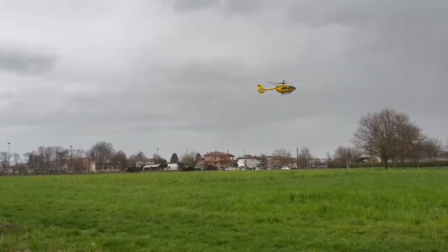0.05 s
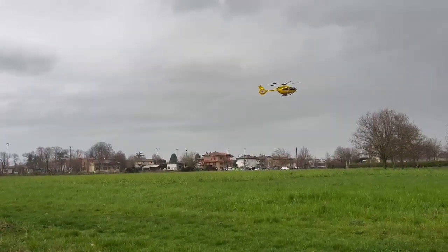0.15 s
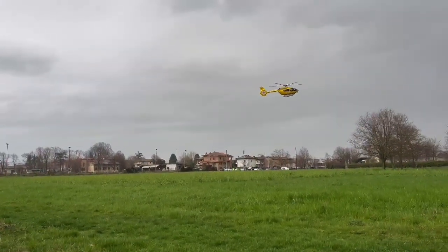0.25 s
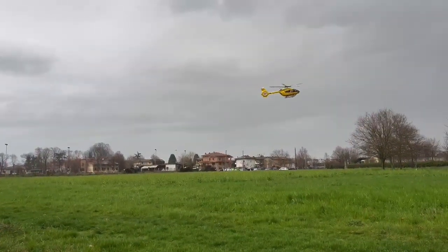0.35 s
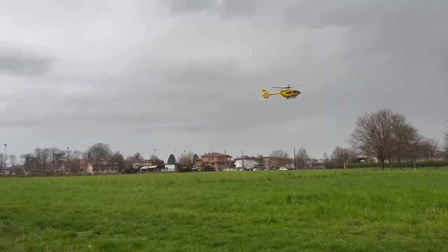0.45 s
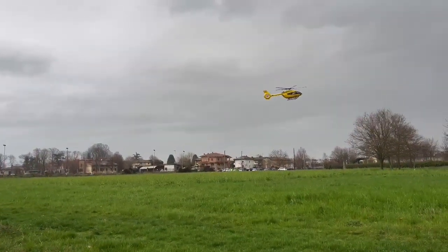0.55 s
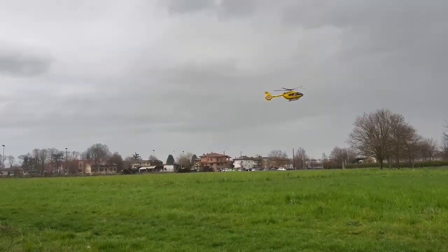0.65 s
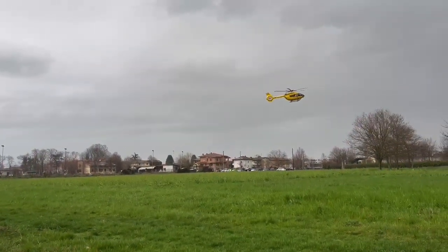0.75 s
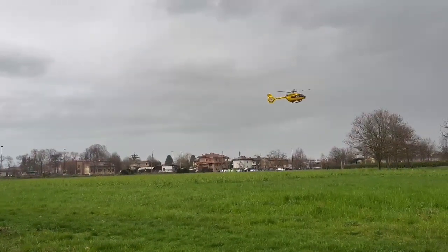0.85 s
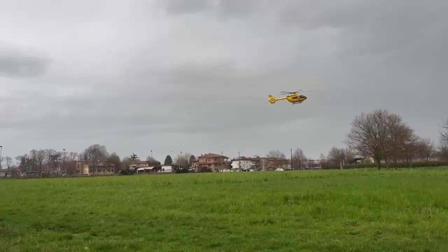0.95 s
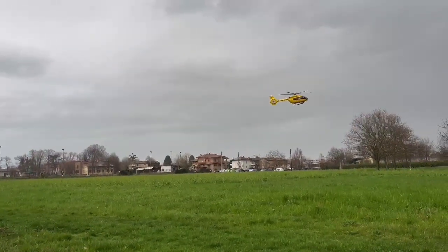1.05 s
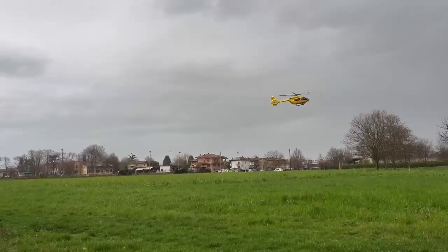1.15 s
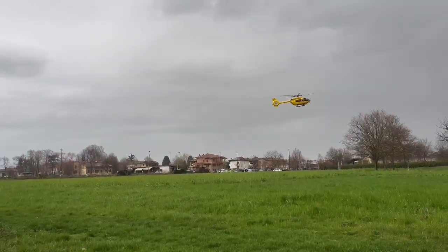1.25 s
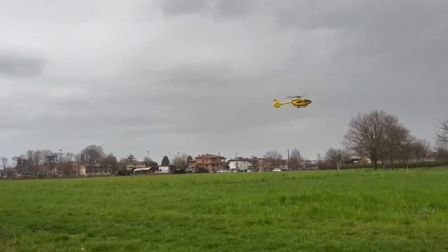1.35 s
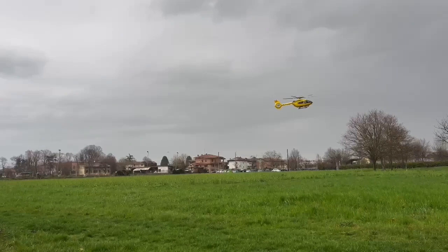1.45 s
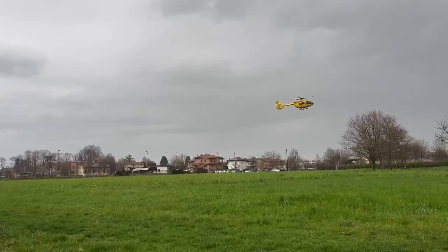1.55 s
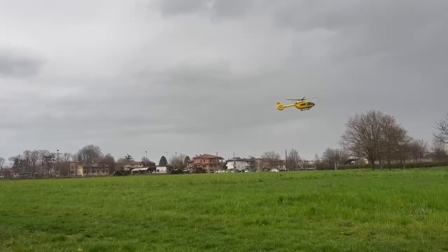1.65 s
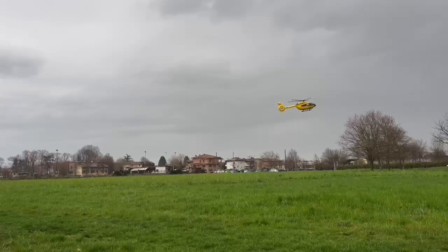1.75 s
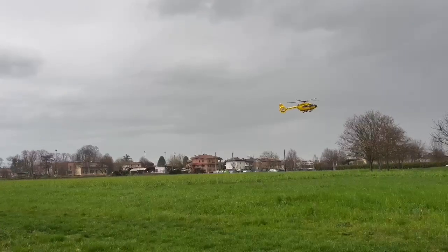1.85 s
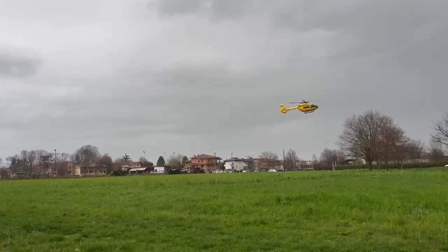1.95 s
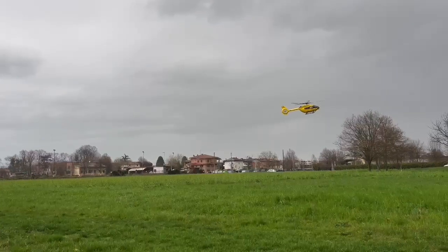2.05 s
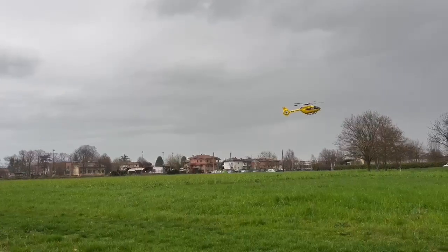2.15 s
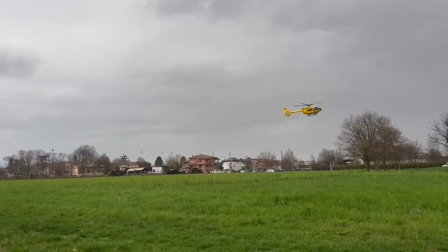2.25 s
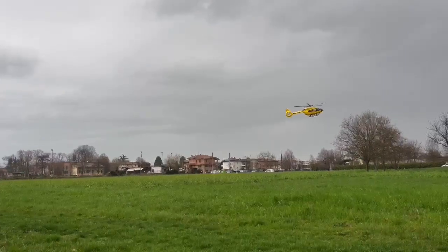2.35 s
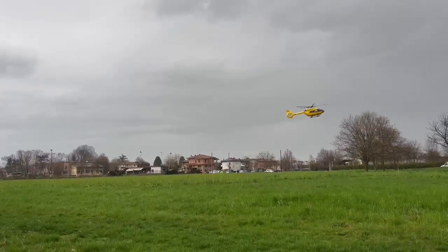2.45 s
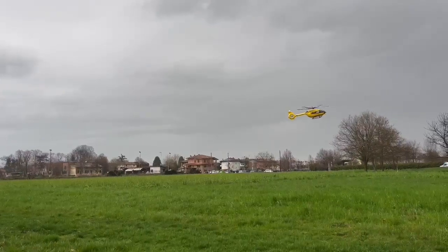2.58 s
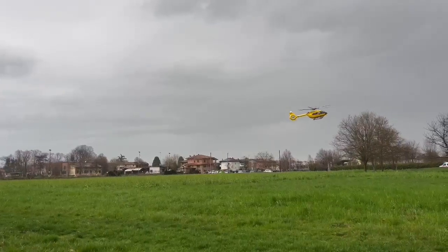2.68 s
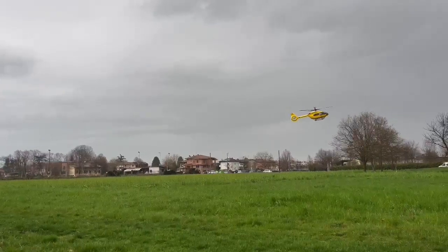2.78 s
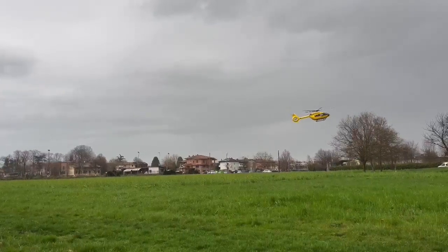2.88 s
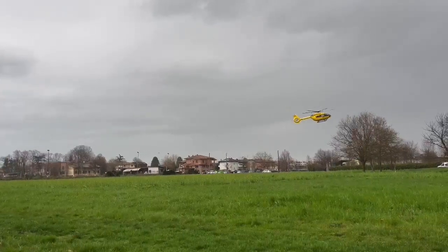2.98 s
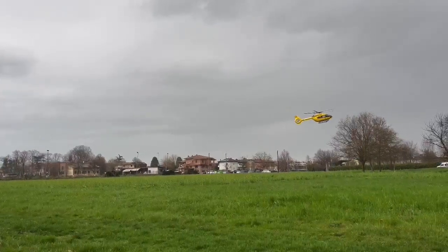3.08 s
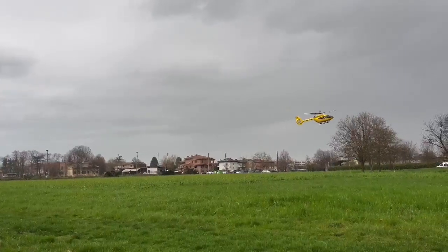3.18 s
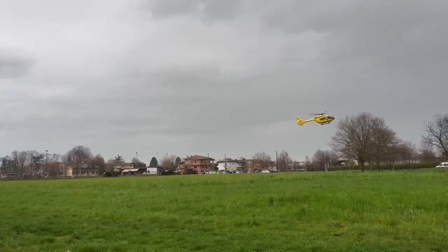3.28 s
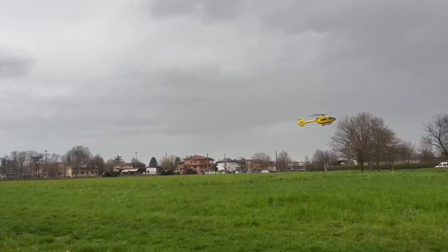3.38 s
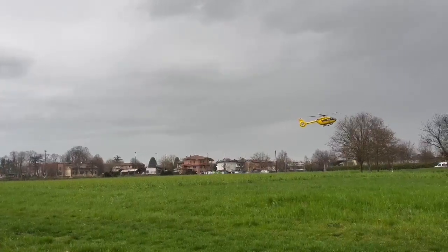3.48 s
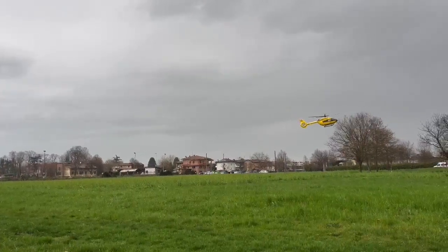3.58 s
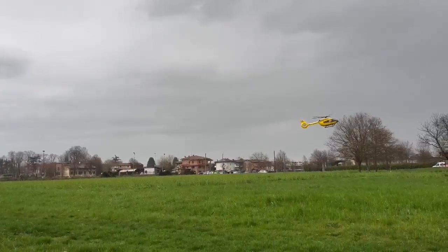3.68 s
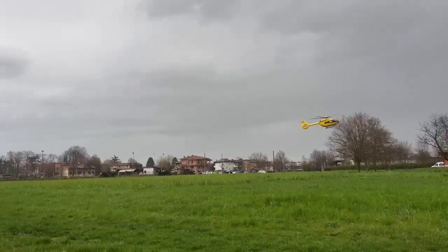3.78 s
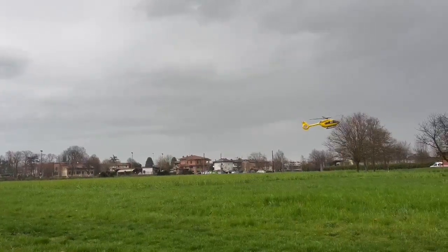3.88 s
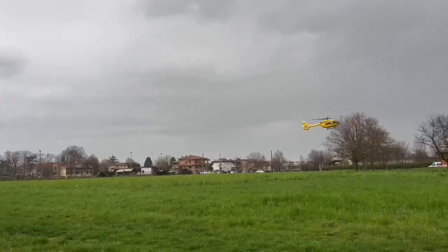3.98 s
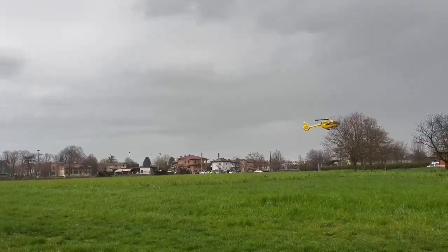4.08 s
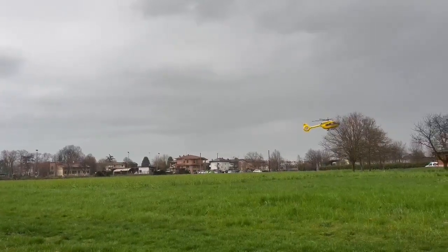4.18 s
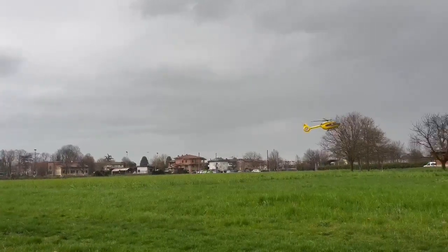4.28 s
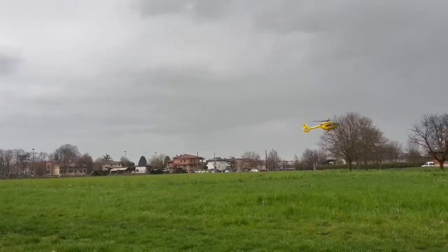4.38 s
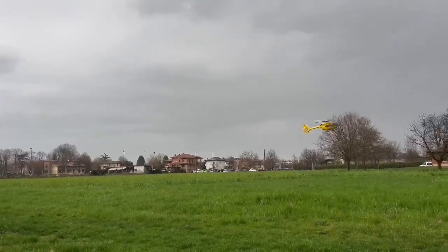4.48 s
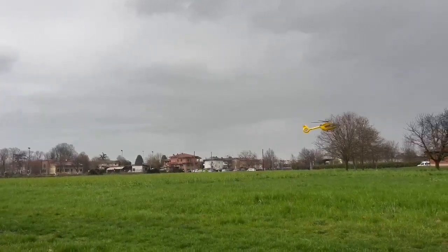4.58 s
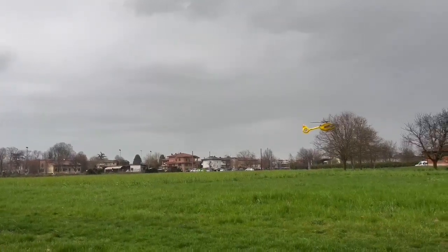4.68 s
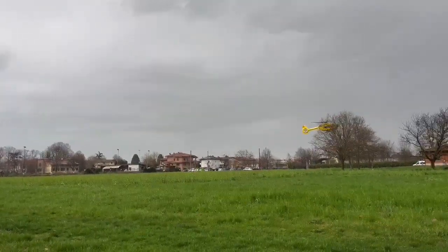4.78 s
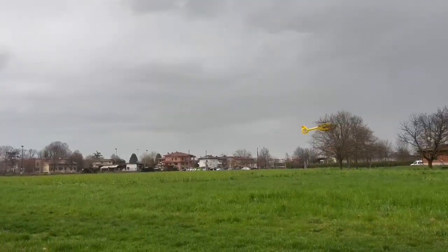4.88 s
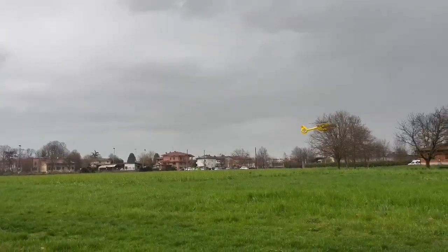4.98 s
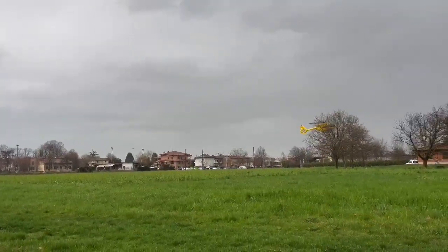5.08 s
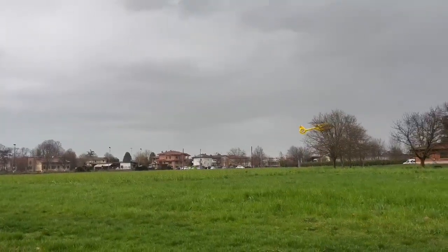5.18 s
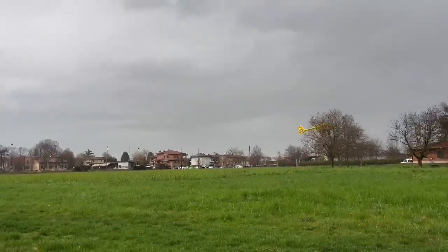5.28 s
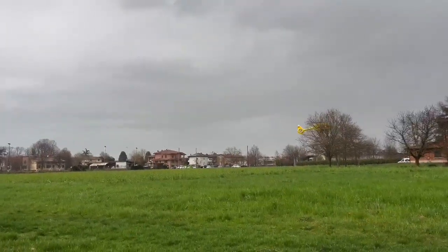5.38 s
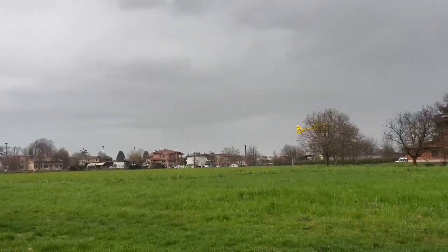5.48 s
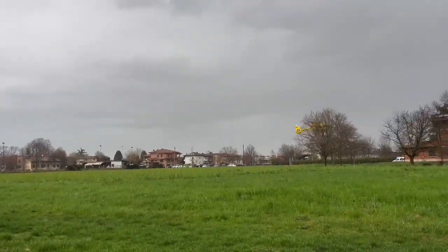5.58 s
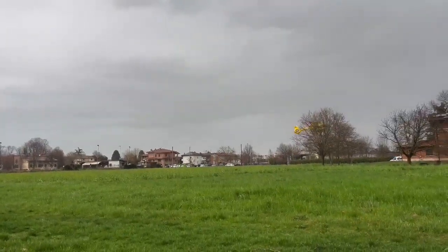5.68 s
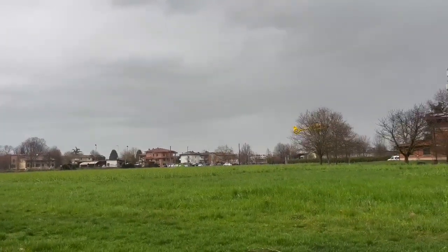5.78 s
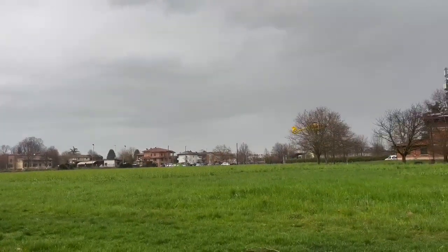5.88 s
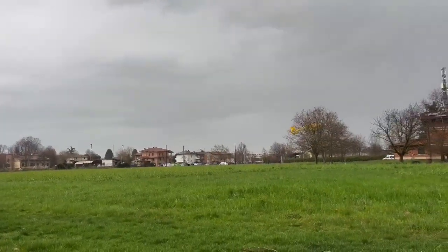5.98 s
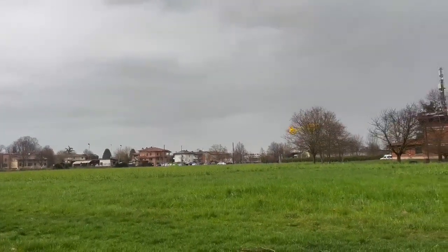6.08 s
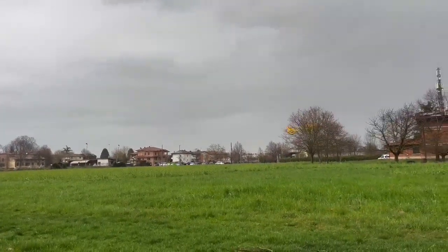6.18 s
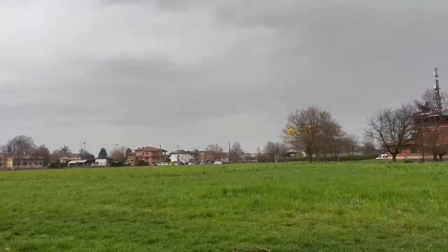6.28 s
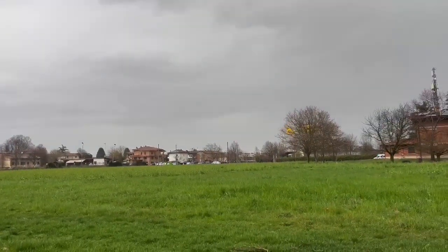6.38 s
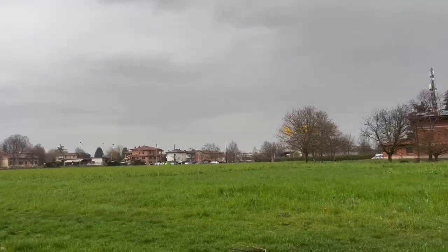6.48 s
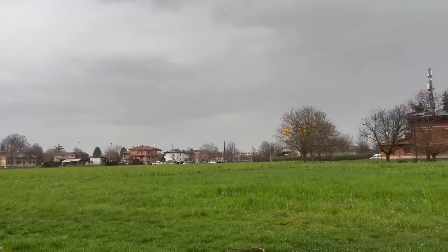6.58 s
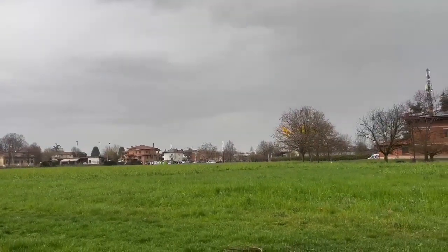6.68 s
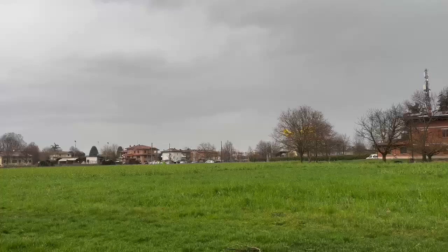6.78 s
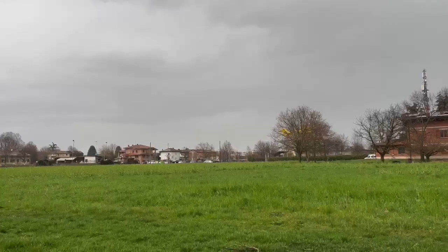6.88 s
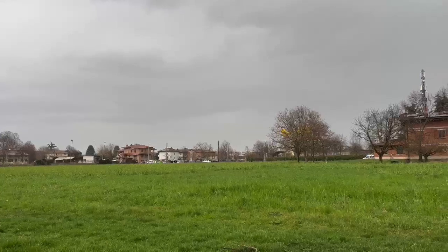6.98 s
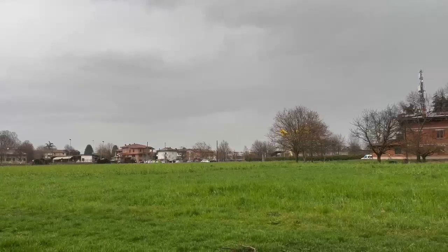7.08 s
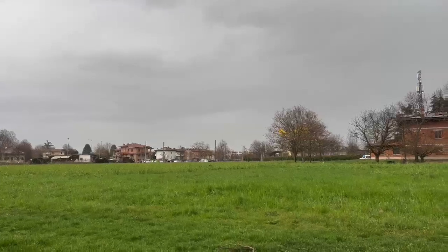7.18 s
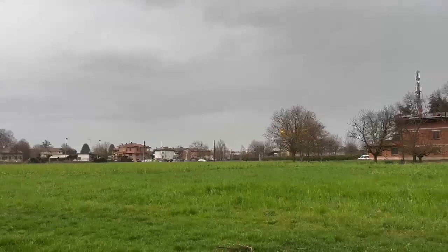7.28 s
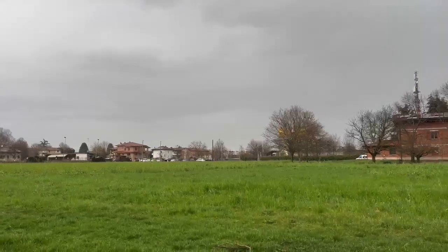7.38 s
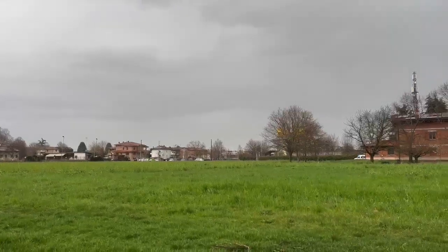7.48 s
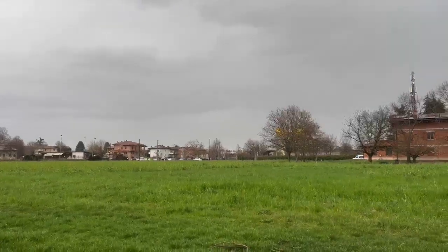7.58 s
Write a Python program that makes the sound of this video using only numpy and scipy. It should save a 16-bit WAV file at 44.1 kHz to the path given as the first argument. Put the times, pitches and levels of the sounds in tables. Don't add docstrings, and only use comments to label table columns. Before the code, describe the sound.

A helicopter is already loud at 0 s, heard across an open field on a hand-held phone. A broad, rough midrange roar flutters at about 32 blade beats a second; the low thump swells in by 0.5 s and wavers, briefly breaking up near 1.4 and 3.9 s. Thin turbine hiss and a fuzzy whine around 8 kHz sit above. From about 2.5 s uneven blades slap harder, with the sharpest dry cracks at 3.8-4.4 s and another run from 5 to 5.6 s. The whine surfaces near 3.8 s and again at 5.2-5.9 s. Near 5.9 s the low thump drops sharply and the slaps smooth out as trees screen the machine, leaving a duller, hollow, still present roar to 7.6 s. Breeze rumbles throughout, with low puffs strongest between 1 and 4.7 s. The stereo colour shifts slowly as the phone turns.

```python
import sys
import numpy as np
from scipy import signal
from scipy.fft import rfft, irfft, next_fast_len
from scipy.io import wavfile
from scipy.ndimage import uniform_filter1d, map_coordinates

SR = 44100
rng = np.random.default_rng(int(sys.argv[2]) if len(sys.argv) > 2 else 0)


def store_wav(level_fs):
    pcm = np.round(np.clip(np.atleast_2d(level_fs), -1, 1) * 32767)
    wavfile.write(sys.argv[1], SR, pcm.T.astype(np.int16))


def convert_level_to_amplitude(level_db):
    exponent = np.asarray(level_db, float) / 20
    return 10 ** exponent


N = 336924
T = np.arange(N) / SR
BLADES_PER_S = 32.37


def evened(x):
    return x / np.sqrt(np.mean(x ** 2) + 1e-20)


def column(rows, t, axis=1):
    columns = np.transpose(rows)
    return np.interp(t, columns[0], columns[axis])


def bumps_db(rows, t):
    coarse = T[::64]
    total_db = sum(db * np.maximum(1 - abs(coarse - s) / half_s, 0) for s, db, half_s in rows)
    return np.interp(t, coarse, total_db)


def drift(rate_hz, count=N):
    hz = np.geomspace(rate_hz / 12, rate_hz, num=16)
    t = T[::64, None]
    sines = np.sin(2 * np.pi * (hz * t + rng.random(16))) / np.sqrt(hz)
    return np.interp(T, t[:, 0], evened(sines.sum(1)))


def noise(colour, patchy_db, size=256, tilt=None):
    hop = size // 4
    frames, hz = N // hop + 5, np.fft.rfftfreq(size, 1 / SR)
    real, imaginary, patches = rng.standard_normal((frames, len(hz), 3)).T
    patches = uniform_filter1d(patches, size=3, axis=0)
    patches = evened(uniform_filter1d(patches, size=40, axis=1))
    colour_hz, colour_db = np.transpose(colour)
    gain = convert_level_to_amplitude(np.interp(np.log(hz + 1), np.log(colour_hz), colour_db, -120, -120))[:, None]
    z = (real + 1j * imaginary) * evened(gain) * convert_level_to_amplitude(patchy_db * patches)
    if tilt:
        z = z * convert_level_to_amplitude(tilt(hz[:, None], np.arange(frames) * hop / SR))
    return signal.istft(z, nperseg=size, noverlap=size - hop)[1][:N] / np.sqrt(size * 2 / 3)


def paths(x, taps):
    k = np.arange(-16, 112)
    kernel = sum(share * np.sinc(k - ms * SR / 1000) for ms, share in taps)
    return signal.oaconvolve(x, kernel)[16:16 + N]


def sum_and_difference(pair):
    return np.array([pair[0] + pair[1], pair[0] - pair[1]]) / 2


def left_and_right(mid, side):
    return np.array([mid + side, mid - side])


# time_s, delay_ms
TRAVEL = [(0, -.5), (.7, 0), (1.2, .5), (1.7, 2.), (2.7, 3.2), (3.4, 3.9), (4.2, 2.9), (5.2, 2.),
          (7.64, 1.)]


def blade_turns():
    return BLADES_PER_S * (T - column(TRAVEL, T) / 1000) + .095


# time_s, level_db
THUMP = [(0, -36.5), (.23, -33), (.45, -22.5), (.81, -20), (1.2, -22.5), (1.7, -25.5), (2.2, -19.5),
         (2.62, -23.5), (3.06, -19.5), (3.3, -27), (3.55, -22.5), (3.8, -24), (4.4, -21.5), (5.1, -21.5),
         (5.4, -20.5), (5.8, -21), (5.95, -35.5), (7.64, -40.5)]
# multiple_of_blade_rate, level_db
THUMP_ORDERS = [(1, -11), (2, 4), (3, -5.5), (4, -12), (5, -21), (6, -19), (7, -21.5), (8, -33)]
# time_s, gain_db, half_length_s
THUMP_DIPS = [(1.06, 3, 0.035), (1.39, -25, 0.078), (1.55, -6.5, 0.11), (2.0, -5, 0.16), (2.26, -1.5, 0.049),
              (2.5, -6.5, 0.16), (3.0, -5, 0.052), (3.13, -9, 0.037), (3.91, -36, 0.097), (4.25, -7, 0.032),
              (4.52, -12, 0.089), (4.7, -10, 0.063), (5.3, -12, 0.059), (5.47, -8, 0.043), (5.77, -26, 0.061),
              (6.63, -24, 0.13), (6.85, -11, 0.047), (7.0, 3, 0.065), (7.19, -12, 0.056), (7.39, -3, .07),
              (7.62, -12, 0.11)]


def thump():
    turns = blade_turns()
    wave = np.zeros(N)
    for k, db in THUMP_ORDERS:
        waver_db = 2.5 * drift(5.) * (k != 2)
        wave += convert_level_to_amplitude(db + waver_db) * np.cos(2 * np.pi * k * turns - .6 + .4 * drift(3))
    return np.sqrt(2) * convert_level_to_amplitude(column(THUMP, T) + bumps_db(THUMP_DIPS, T) - 5.5) * wave


# time_s, roar_db, clearness_db
ROAR = [(0, -28.5, -0.5), (.5, -25, -1.5), (1.15, -29, 0), (1.35, -25.5, -1.5), (1.75, -28.5, -1),
        (2.32, -31.5, -3), (2.75, -32, -0.5), (3.0, -29, 0), (3.5, -30, -3), (3.85, -25.5, -3),
        (4.1, -25.5, -4.5), (4.55, -29.5, -1.5), (4.95, -31, -1.5), (5.35, -29, -2.5), (6.0, -27, -1.5),
        (6.6, -31, -0.5), (7.0, -28.5, -2), (7.64, -28, -5.5)]
# time_s, treble_lift_db, half_length_s
SPELLS = [(.37, 4, 0.067), (.85, 0.5, 0.2), (1.27, 3.5, 0.1), (2.05, 3.5, 0.02), (2.55, 2, 0.079),
          (2.67, -2, 0.072), (3.05, 2, 0.14), (3.82, 0.5, 0.057), (4.4, 4.5, 0.18), (4.75, 3.5, 0.12),
          (4.93, -1, 0.055), (5.17, 1.5, 0.035), (5.74, 2.5, 0.088), (6.12, 2, 0.045), (6.82, 3, 0.24),
          (7.32, 2, 0.18)]


def clearness_db(t):
    return column(ROAR, t, axis=2) + bumps_db(SPELLS, t)


# freq_hz, level_db_per_hz
ROAR_COLOUR = [(120, -37), (200, -25), (296, -17), (486, -4), (660, 3), (978, -2.5), (1200, -12.5),
               (1630, -4.5), (1940, -6), (2790, -11.5), (3370, -10.5), (3960, -11.5), (4650, -18.5),
               (5540, -27.5), (6500, -32), (8450, -68), (14300, -120)]
# time_s, slap_over_steady_roar_db
SLAP = [(0, -7), (1, -2), (1.35, 0.5), (1.7, -1), (2.2, -1.5), (2.45, 1.5), (2.7, -0.5), (2.9, 3.5),
        (3.1, 0), (3.4, -2.5), (3.85, 6), (4.3, 0.5), (4.7, -7.5), (5.0, 0.5), (5.25, 6), (5.5, -6),
        (5.8, -3), (7.64, -16)]
# freq_hz, gain_db
GROUND = [(280, 9.5), (470, -7.5), (750, -3), (1020, 5), (1200, 7), (2200, 0), (2500, 8), (3200, -1)]


def roar_tilt(hz, t):
    clear_db = clearness_db(t)
    near2_db, near4_db = 0.78 * clear_db + 0.78, 1.56 * clear_db + 1.82
    ground_db = np.interp(t, [4.63, 6.54], [0, 1]) * column(GROUND, hz)
    around_2k = np.interp(hz, [1230, 1680, 2860, 3800], [0, 1, 1, 0])
    return ground_db + near2_db * around_2k + near4_db * np.interp(hz, [2800, 3400], [0, 1])


def roar():
    rise, fall = 0.1, 0.34
    turns = blade_turns()
    blade = np.round(turns).astype(int)
    size, shift = rng.standard_normal((blade.max() + 1, 2)).T
    late = turns - blade - 0.021 * shift[blade] + 0.13
    burst = convert_level_to_amplitude(1.9 * np.clip(size[blade], -3, 1.5)) * np.exp(-(late / np.where(late < 0, rise, fall)) ** 2)
    strength = convert_level_to_amplitude(column(SLAP, T))
    pulse = np.sqrt((1 + 2.05 * strength ** 2 * burst ** 2) / (1 + 0.62 * strength ** 2))
    level = convert_level_to_amplitude(column(ROAR, T) + 0.18 * bumps_db(SPELLS, T) + 8.5 + .5 * drift(11.0))
    air = np.array([noise(ROAR_COLOUR, 1.4, tilt=roar_tilt) for _ in range(3)])
    core = signal.sosfilt(signal.butter(2, [500, 2600], "bandpass", fs=SR, output="sos"), air)
    heard = level * (pulse ** 0.78 * core + pulse ** 0.7 * (air - core))
    since_s = np.maximum(late + rise, 0) / BLADES_PER_S
    ring = np.zeros(N)
    for hz, share, wobble in [(900, 1, shift), (2050, .6, size)]:
        ring += share * np.sin(2 * np.pi * hz * (1 + 0.11 * np.tanh(wobble[blade])) * since_s)
    knock = convert_level_to_amplitude(2.5) * air[0].std() * level * strength * np.exp(-since_s / 0.0032) * ring
    return heard[0] + knock, heard[1:]


# time_s, lag_ms
BOUNCE = [(0, 0.87), (1, 1.02), (2, 1.01), (3.4, 1.07), (4.8, 1.074), (5.4, 1.273), (6, 1.57), (7.64, 1.63)]
# delay_ms, share
LEFT_DIRECT = [(0, 1.0), (.11, .5), (.6, -.3), (.88, .2), (1.66, -.26)]
# delay_ms, share
RIGHT_DIRECT = [(0.242, 0.49), (0.828, -0.031), (0.961, 0.099)]
# delay_ms, share
LEFT_BOUNCE = [(0, .36), (.3, -.1)]
# delay_ms, share
RIGHT_BOUNCE = [(0.2, 0.5), (0.406, -0.61), (0.633, 0.43)]
# delay_ms, share
LEFT_TURNED = [(.6, .25), (.8, .3), (.88, -.1), (1.66, .26)]


def ports(air):
    lag_ms = column(BOUNCE, T) + .018 * drift(3)
    read_at = np.arange(N) - lag_ms * SR / 1000
    bounce = [map_coordinates(x, [read_at], order=2, mode="nearest") for x in air]
    turned = np.clip((lag_ms - 1.16) / 0.4, 0, 1)
    left = paths(air[0], LEFT_DIRECT) + paths(bounce[0], LEFT_BOUNCE)
    left += turned * paths(air[0], LEFT_TURNED)
    right = paths(air[1], RIGHT_DIRECT) + (1 - .5 * turned) * paths(bounce[1], RIGHT_BOUNCE)
    return np.array([convert_level_to_amplitude(-7.5 - 2.3 * turned) * left, convert_level_to_amplitude(1.5) * right])


# freq_hz, left_minus_right_db
LEAN = [(300, -2), (450, 1.5), (720, -12), (1000, 0), (1400, 8.5), (1900, 4), (2600, 7), (3500, 4.5)]


def shade(pair):
    size = next_fast_len(N)
    lean_db = column(LEAN, np.fft.rfftfreq(size, 1 / SR))
    return irfft(rfft(pair, size) * convert_level_to_amplitude(np.array([lean_db / 2, -lean_db / 2])), size)[:, :N]


# start_s, end_s, freq_hz, gain_db, width_hz
SUM_HOLLOWS = [(0, 3.6, 1720, -4.5, 51), (1.5, 1.46, 2620, -1, 140), (0, 0.77, 4300, -4, 100),
               (0.3, 0.8, 570, 2.5, 100), (2, 4.5, 4400, 5.5, 170), (0, 1.4, 780, -0.5, 44),
               (0.5, 2.5, 1980, 3, 68), (1.2, 2.9, 1480, 3.5, 92), (-1, 3.3, 965, 3.5, 43),
               (-2, 2.4, 1154, -3, 100), (2.3, 2.7, 3410, 8, 100), (3, 3.2, 2000, 3.5, 630),
               (2.5, 4.6, 3250, -0.5, 130), (4, 5.6, 1900, -3, 120), (5, 5.7, 1300, 5, 90),
               (5, 5.45, 2850, -4, 470), (5.5, 5.3, 2150, 2, 250), (8.5, 8.3, 2590, -3, 50),
               (6, 6.15, 1840, 3, 170), (6, 6.1, 2270, 0.5, 110), (5, 7, 3210, -3.5, 110),
               (5, 7.7, 960, -3.5, 52), (6, 7.7, 2740, -6.5, 71), (-4, 5.5, 273, -5.5, 55),
               (6.5, 9.2, 190, -4.5, 74), (4.5, 4.95, 1050, 2.5, 290), (4, 4.35, 790, 2, 470),
               (-1.5, 6.9, 385, 4, 43), (5, 5.52, 1800, -4, 450), (9, 6.92, 1220, -4, 280),
               (3.6, 4.1, 950, -3, 210), (5, 5.8, 920, 2.5, 75), (2.2, 2.4, 610, -4.5, 110),
               (4.5, 6.4, 2020, 4, 190), (5.5, 6.5, 1000, 2, 200), (3.9, 4.4, 3200, 3.5, 380),
               (0.2, 0.43, 3440, 5.5, 170), (0.3, 2.2, 2200, -5, 60), (7, 7.7, 350, -6, 125),
               (4, 4.5, 1600, 4.5, 300),
               (0, .12, 2220, -12, 70), (.2, .58, 2270, -16, 80), (.1, .52, 3000, -13, 70),
         (.68, 1.02, 2930, -15, 70), (1.07, 1.55, 2890, -11, 70), (.55, 1.5, 3620, -10, 60),
         (.2, .5, 4200, -9, 60), (1.2, 1.55, 4480, -10, 70), (2.5, 3.2, 3420, -9, 80),
         (2.7, 3.2, 2760, -9, 70), (2.45, 3.3, 4420, -9, 70), (5.8, 7.7, 2150, -6, 60),
         (5.8, 7., 3200, -6, 60), (6.9, 7.7, 2700, -6, 60)]
# start_s, end_s, freq_hz, gain_db, width_hz
DIFFERENCE_HOLLOWS = [(0, 1.6, 1880, -4, 500), (0, 1.4, 4250, -11, 200), (1.5, 3.4, 2010, -0.5, 300),
                      (3.4, 5.7, 1900, 0, 250), (3.4, 5.7, 3520, 1.5, 400), (4.7, 5.7, 1250, 0, 149),
                      (5.7, 7.7, 800, -5.5, 200), (5.7, 7.7, 1500, -6.5, 250), (5.7, 7.7, 1960, -4.5, 180),
                      (5.7, 7.7, 2480, -8, 250), (0, 3.8, 700, -2.5, 250)]


def hollowed(pair):
    fade_s, sway_hz = .06, 25
    hz, t, z = signal.stft(sum_and_difference(pair), SR, nperseg=768)
    swayed_hz = hz[:120, None] + sway_hz * np.interp(t, T, drift(4.))
    for k, rows in enumerate([SUM_HOLLOWS, DIFFERENCE_HOLLOWS]):
        gain_db = 0
        for start_s, end_s, centre_hz, db, width_hz in rows:
            present = np.clip(np.minimum(t - start_s, end_s - t) / fade_s + 1, 0, 1)
            gain_db = gain_db + db * present * np.exp(-((swayed_hz - centre_hz) / width_hz) ** 2)
        z[k, :120] *= convert_level_to_amplitude(gain_db)
    mid, side = signal.istft(z, SR, nperseg=768)[1][:, :N]
    return left_and_right(mid, side)


# freq_hz, level_db_per_hz
HISS_MID = [(2820, -14.5), (4800, 4.5), (5510, -0.5), (6810, -2.5), (7350, -4.5), (7820, -10),
            (8050, -18.5), (8260, -4), (8630, -5.5), (9080, -5), (9700, -3), (10200, -8), (10500, -13.5),
            (11500, -11.5), (14900, -81), (22000, -120)]
# freq_hz, level_db_per_hz
HISS_SIDE = [(2820, -39), (4800, 0), (5530, 2.5), (6220, -4.5), (7600, -3.5), (8290, 0), (8980, -7),
             (9840, -3.5), (10300, -51), (11300, -67), (11500, -62), (14900, -89), (22000, -120)]
# time_s, pitch_hz
WHINE_HZ = [(0, 8150), (1.1, 8200), (1.5, 8420), (3.8, 8400), (5.5, 8417), (7.64, 8400)]
# time_s, level_db
WHINE = [(0, -61.5), (.8, -58.5), (1.27, -66), (1.6, -58), (3.3, -54.5), (3.62, -50.5), (3.82, -41),
         (4.2, -55), (4.5, -75), (4.8, -59), (5.2, -47.5), (5.5, -48.5), (5.72, -45), (5.9, -46.5),
         (6.3, -65), (6.6, -56), (6.87, -60), (7.2, -67)]


def turbine():
    loud_db = column(ROAR, T) - column(ROAR, T).mean()
    trees_db = np.interp(T, [4.9, 5.8], [0, -5.5])
    hiss_db = -51 + 0.74 * loud_db + 0.36 * clearness_db(T) + trees_db
    hiss = convert_level_to_amplitude(hiss_db) * np.array([convert_level_to_amplitude(7.5) * noise(HISS_MID, 2.17), convert_level_to_amplitude(8.5) * noise(HISS_SIDE, 1.2)])
    carrier = np.exp(2j * np.pi * np.cumsum(column(WHINE_HZ, T) + 60. * drift(7.3)) / SR)
    r = np.exp(-np.pi * 450 / SR)
    grain = rng.standard_normal((2, N)) + 1j * rng.standard_normal((2, N))
    fuzz = signal.lfilter([1], [1, -2 * r, r * r], grain)
    whine = convert_level_to_amplitude(column(WHINE, T) + np.array([[-4.], [1.]])) * evened((fuzz * carrier).real)
    mid, side = hiss + whine
    mid = mid * convert_level_to_amplitude(np.interp(T, [1.2, 1.5, 5.1, 5.4], [0.5, -1.0, -0.5, -2.5]))
    return left_and_right(mid, side)


# time_s, level_db
WIND = [(0, -31.5), (.3, -30), (.75, -21), (1.2, -20), (1.4, -27.5), (1.8, -24), (2.4, -25), (3.2, -23),
        (4.0, -20.5), (4.7, -20), (4.95, -24), (5.7, -24), (6.0, -27.5), (6.5, -29.5), (7.2, -30.5),
        (7.64, -31.5)]
# freq_hz, level_db_per_hz
WIND_COLOUR = [(15, -36), (32, -20), (50, 4), (100, -3.5), (180, -5.5), (300, -18), (500, -21), (900, -65)]
# time_s, lift_db
GUSTS = [(.34, 5), (1.25, 3.5), (1.74, -5), (1.89, 9.5), (1.981, 14), (2.19, 10), (2.36, -6), (2.44, 5),
         (2.57, 8.5), (2.72, -1), (2.87, 7), (3.36, 4), (3.69, -6), (3.811, 1.5), (4.04, 2.5), (4.32, 3),
         (4.49, -10), (4.54, 4.5), (4.68, 4.5), (5.342, 8), (5.75, 4.5), (6.2, 8), (6.45, 5), (6.661, 3),
         (6.87, 6), (6.98, 8), (7.12, 1), (7.19, -8), (7.3, -2), (7.55, -7)]


def wind():
    both, left, right = (convert_level_to_amplitude(1.2 * drift(25.)) * noise(WIND_COLOUR, 2.5, size=2048) for _ in range(3))
    gusts_db = bumps_db([(s, db, 0.04) for s, db in GUSTS], T)
    return convert_level_to_amplitude(column(WIND, T) + gusts_db - 1.) * (.6 * both + .8 * np.array([left, right]))


# start_s, peak_db, pitch_hz, left_minus_right_db
PUFFS = [(1.058, -18, 96, 0.5), (1.243, -11, 170, 1.0), (1.888, -17, 132.8, 1), (1.975, -9.5, 127, -5),
         (1.98, -14, 283, 0), (2.57, -18, 159, 0), (2.715, -18.5, 209, -2), (2.871, -15, 191, 2),
         (3.31, -18, 149, 0), (3.359, -27, 141, 0), (3.794, -10, 109, -2), (3.804, -16.5, 200, -2),
         (4.039, -16, 170, -4), (4.525, -11.5, 192, 9), (4.539, -17, 105, -2), (4.665, -12.5, 149, 0),
         (4.69, -16.5, 190, 1), (5.339, -19.5, 160, 0), (5.673, -33, 91.5, 8), (6.971, -20, 181, -2)]


def puffs():
    out, t = np.zeros((2, N)), np.arange(2600) / SR
    for s, db, hz, pan_db in PUFFS:
        swell = t / 0.013 * np.exp(1 - t / 0.0074)
        shape = swell * np.sin(2 * np.pi * hz * (1.38 * t - 7.3 * t ** 2))
        out[:, round(s * SR):][:, :len(t)] += convert_level_to_amplitude(db - 1.5 + np.array([[pan_db / 2], [-pan_db / 2]])) * shape
    return out


# start_s, peak_db, ring_hz
CRACKS = [(2.498, -22, 964), (2.621, -17, 676), (2.648, -15, 670), (2.744, -17, 970), (2.776, -23, 945),
          (2.898, -36, 896), (2.93, -17, 900), (2.958, -15, 953), (2.994, -19, 900), (3.023, -28, 641),
          (3.053, -13, 653), (3.085, -13, 907), (3.145, -21, 900), (3.177, -17, 940), (3.206, -14, 926),
          (3.239, -16, 870), (3.333, -19, 950), (3.584, -17, 689), (3.643, -15, 940), (3.676, -19, 900),
          (3.705, -28, 1020), (3.731, -28, 870), (3.762, -23, 627), (3.827, -10, 1010), (3.855, -10.5, 790),
          (3.887, -15, 826), (3.92, -19, 950), (3.954, -9, 750), (3.979, -23, 1050), (4.008, -23, 910),
          (4.043, -19, 900), (4.072, -10, 1020), (4.105, -14, 790), (4.131, -9, 745), (4.163, -20, 800),
          (4.226, -16, 990), (4.26, -7, 890), (4.289, -9, 810), (4.384, -13, 940), (4.423, -11, 958),
          (4.999, -14, 1010), (5.031, -17, 970), (5.061, -21, 930), (5.096, -19, 982), (5.155, -20, 940),
          (5.183, -18, 982), (5.212, -24, 900), (5.243, -17, 900), (5.277, -14, 900), (5.311, -12, 920),
          (5.34, -17.5, 900), (5.403, -13, 900), (5.433, -22, 821), (5.494, -14, 915), (5.525, -21, 820),
          (5.558, -26, 850), (5.585, -13, 860), (5.643, -21, 816)]


def cracks():
    rise_s, fall_s = .001, .003
    out, t = np.zeros(N), np.arange(900) / SR
    shape = np.minimum(t / rise_s, 1) * np.exp(-np.maximum(t - rise_s, 0) / fall_s)
    grit = rng.standard_normal((len(CRACKS), 2))
    for (s, db, hz), (phase, spread) in zip(CRACKS, grit):
        edge_hz = 2050 * (1 + .14 * np.tanh(spread))
        edge = convert_level_to_amplitude(-4) * np.exp(-t / fall_s) * np.sin(2 * np.pi * edge_hz * t + phase)
        out[round(s * SR):][:len(t)] += convert_level_to_amplitude(db - 2) * shape * (np.sin(2 * np.pi * hz * t) + edge)
    return np.array([out, paths(out, [(.24, 1.1), (1.1, .3)])])


def scene():
    crack = cracks()
    direct, scattered = roar()
    heard = ports(direct + convert_level_to_amplitude(-11) * scattered) + convert_level_to_amplitude(-11.5) * scattered
    low = convert_level_to_amplitude([[-.5], [.5]]) * thump()
    return low + crack + hollowed(shade(heard)) + turbine() + wind() + puffs()


# start_s, end_s, low_hz, high_hz, stricter_db
STRICT = [(0, 1.33, 7100, 7950, 7), (0, 1.33, 7950, 8400, 2), (0, 1.38, 8400, 8850, 7),
          (0, 3.3, 10300, 11000, 2.5), (0, 3.3, 11000, 11700, 3), (3.3, 5.3, 10350, 11700, 5),
          (1.3, 5.2, 6900, 7500, -1), (1.4, 5.2, 8900, 10300, -3), (1.4, 4.2, 8200, 8900, -2),
          (4.2, 4.8, 7600, 8800, 3), (5.7, 7.4, 5150, 5800, 3), (5.75, 5.94, 8900, 11700, 5)]


def gate(dry):
    hz, t, z = signal.stft(sum_and_difference(dry), SR, nperseg=1024, noverlap=768)
    rows, cols = np.arange(0, len(hz), 4), np.arange(0, len(t), 4)
    tile_hz, tile_s = hz[rows], t[cols]
    power = np.add.reduceat(np.add.reduceat(abs(z) ** 2, rows, axis=1), cols, axis=2)
    around = uniform_filter1d(uniform_filter1d(power.sum(0), size=7, axis=0), size=6, axis=1)
    edge_db = np.interp(tile_hz, [1500, 2430, 4200, 5330, 6400, 7860, 8400, 10350, 11290],
                        [-59, -10.5, -10, -7, -6, -5, -7.5, -6.0, 2.0])[:, None]
    strict_db = np.interp(tile_s, [1.25, 1.35, 5.15, 5.25], [0.37, -0.28, -0.4, 0.88])
    strict_db = strict_db * (tile_hz[:, None] > 4800) + np.array([[[0.1]], [[1.5]]])
    over_db = 10 * np.log10(power / (around + 1e-20) + 1e-20) - edge_db - strict_db
    for start_s, end_s, low_hz, high_hz, db in STRICT:
        in_band = (tile_hz > low_hz) & (tile_hz < high_hz)
        over_db[0] -= db * np.outer(in_band, (tile_s > start_s) & (tile_s < end_s))
    clumps = rng.standard_normal((2, len(rows) // 3 + 1, len(cols))).repeat(3, axis=1)[:, :len(rows)]
    flicker = evened(uniform_filter1d(clumps, size=2, axis=2) + .4 * clumps[:, :1])
    over_db += 1.8 * flicker * (tile_hz[:, None] > 7000)
    kept = np.clip(over_db / 0.3, 0, 1).repeat(4, axis=1).repeat(4, axis=2)[:, :len(hz), :len(t)]
    mid, side = signal.istft(z * kept, SR, nperseg=1024, noverlap=768)[1][:, :N]
    return left_and_right(mid, side)


def top_cut(x):
    return signal.sosfilt(signal.butter(12, 11620, fs=SR, output="sos"), x)


def record(dry):
    mix = gate(dry)
    return top_cut(mix)


dry = scene()
out = record(dry)
store_wav(out)
```